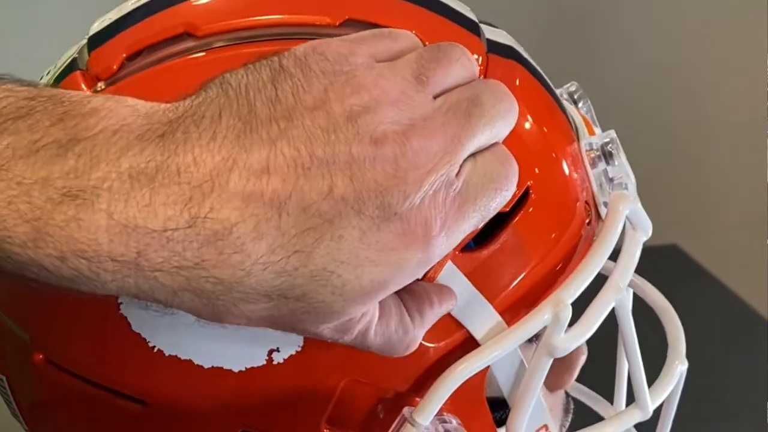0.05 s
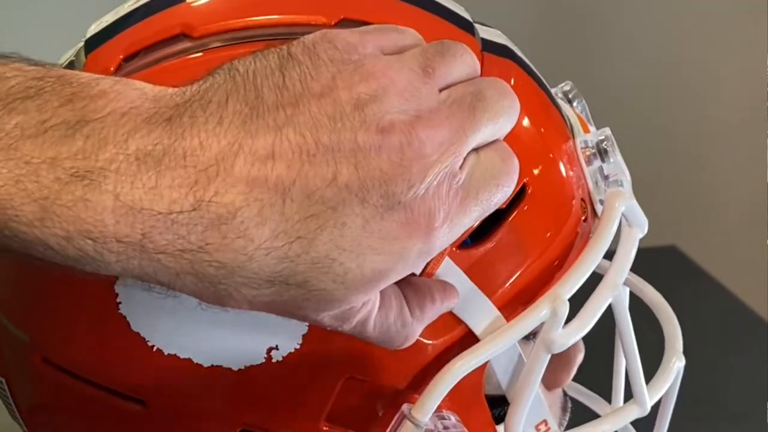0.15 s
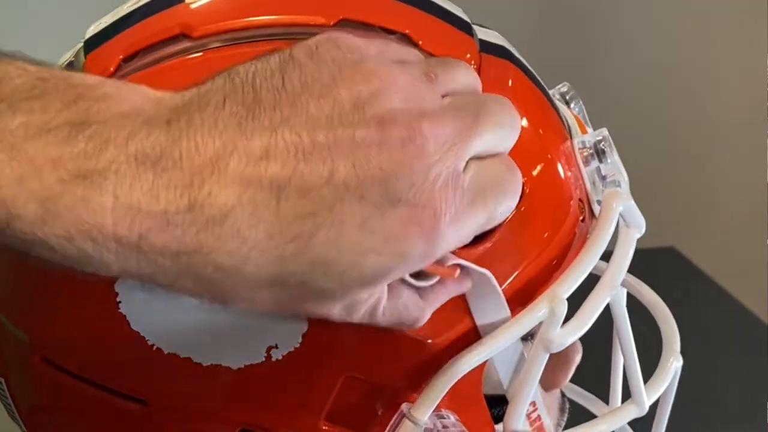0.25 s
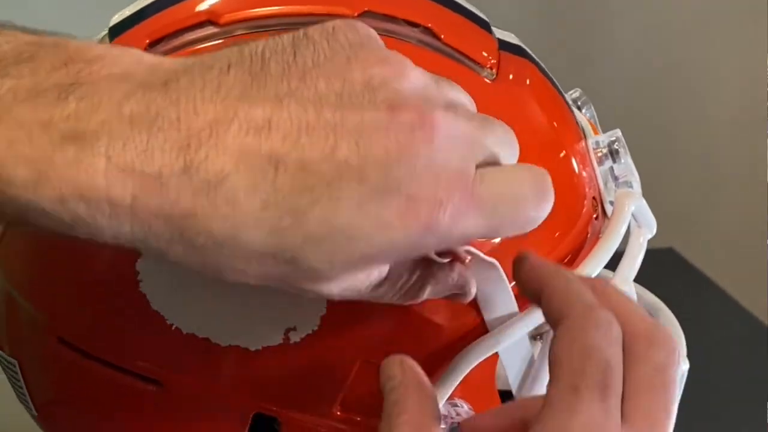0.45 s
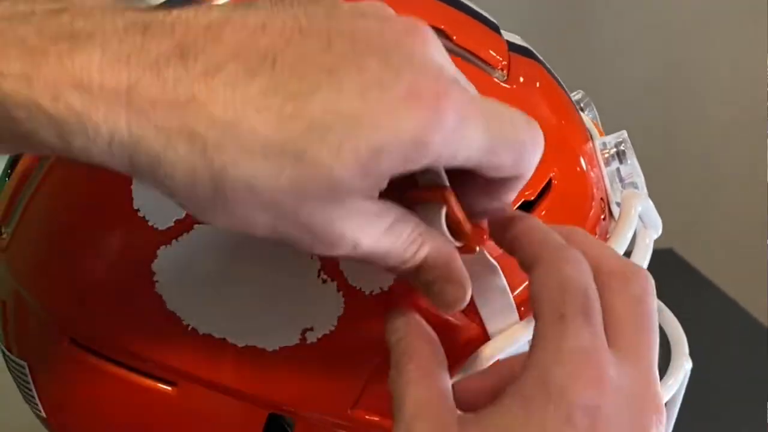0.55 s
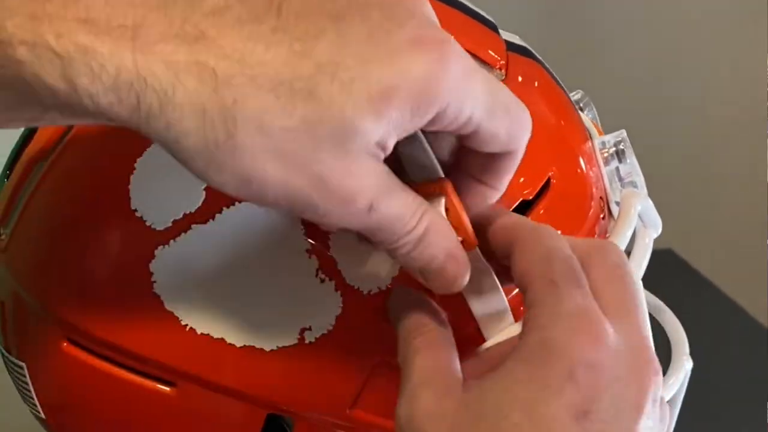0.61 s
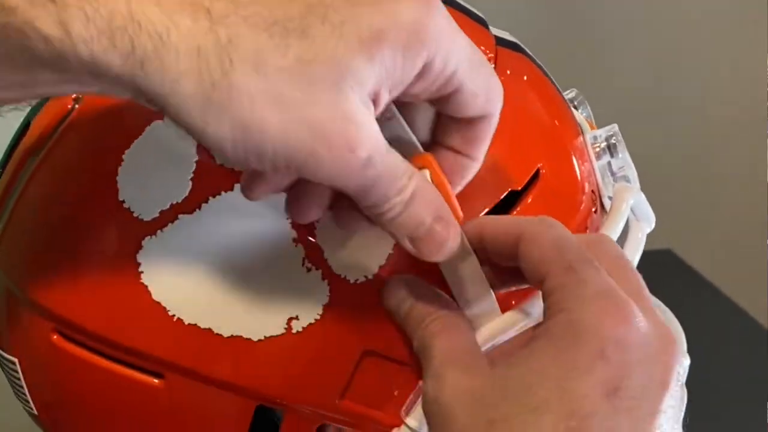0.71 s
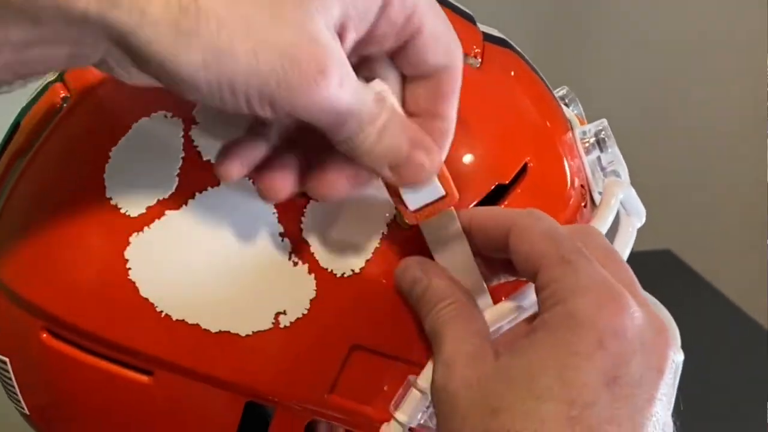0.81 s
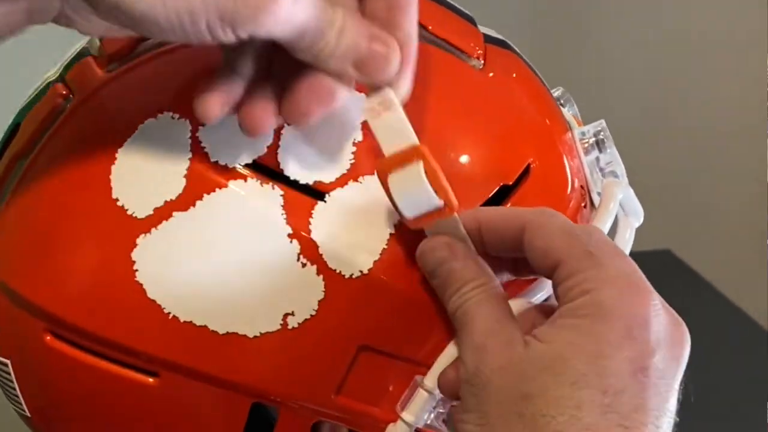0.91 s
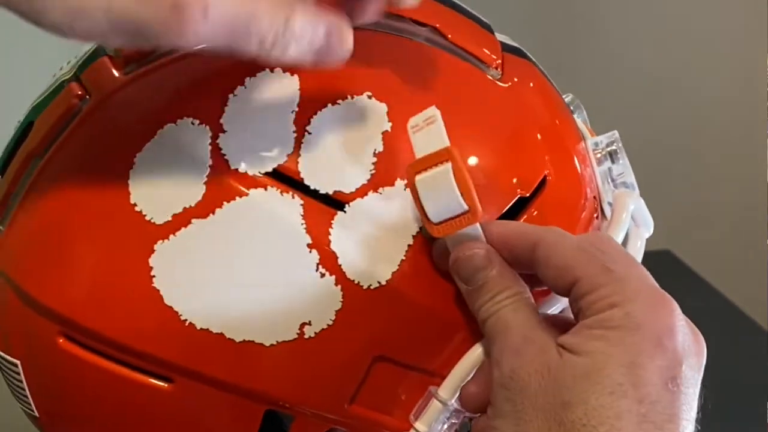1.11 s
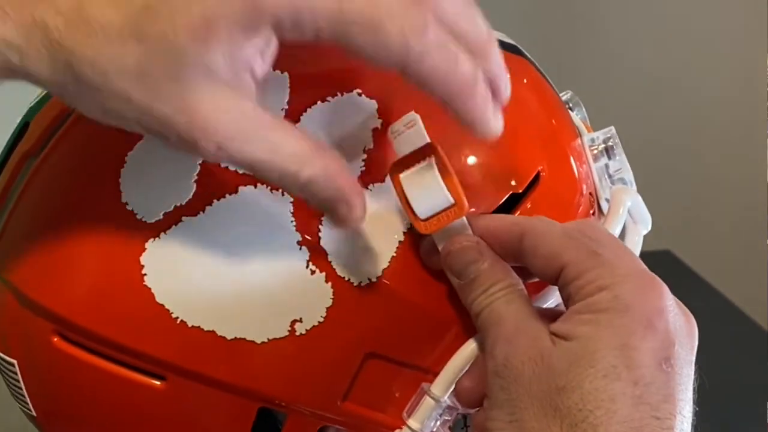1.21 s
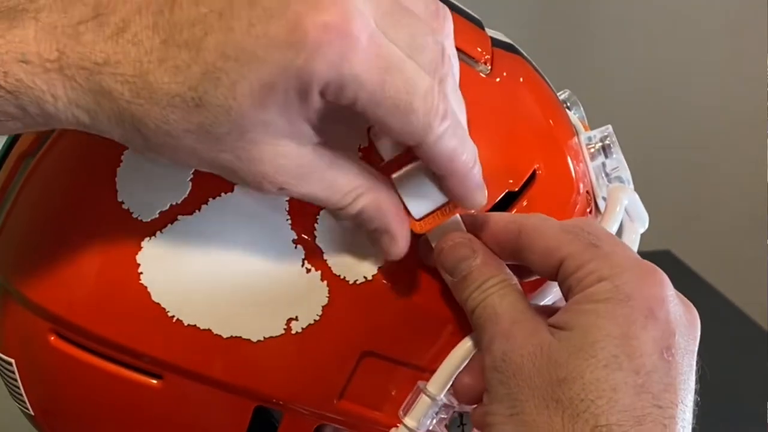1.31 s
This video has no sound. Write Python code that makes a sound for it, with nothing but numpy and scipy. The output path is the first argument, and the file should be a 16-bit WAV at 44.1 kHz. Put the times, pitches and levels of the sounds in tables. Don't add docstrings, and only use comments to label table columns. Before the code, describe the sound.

A plastic helmet strap snap creaks, then pops loudly open, followed by quiet strap rubbing and ticking

```python
import sys
import numpy as np
from scipy import signal
from scipy.fft import rfft, irfft
from scipy.io import wavfile

SR = 44100
rng = np.random.default_rng(int(sys.argv[2]) if len(sys.argv) > 2 else 0)


def ratio_of_db(decibels):
    return 10 ** (np.asarray(decibels, float) / 20)


def unload_wav(signal):
    wavfile.write(
        sys.argv[1],
        SR,
        np.round(np.clip(np.atleast_2d(signal).T, -1, 1) * 32767).astype(np.int16),
    )


N = 59535


def rms_one(x):
    return x / np.sqrt(np.mean(x ** 2) + 1e-20)


def at_hz(points, hz):
    table_hz, value = np.transpose(points)
    return np.interp(np.log(hz + 1), np.log(table_hz + 1), value)


def coloured(x, spectrum):
    hz = np.arange(N // 2 + 1) * SR / N
    low_edge = 1 / (1 + (spectrum[0][0] / (hz + 1)) ** 4)
    high_edge = 1 / (1 + (hz / spectrum[-1][0]) ** 16)
    return irfft(rfft(x) * ratio_of_db(at_hz(spectrum, hz)) * low_edge * high_edge, N)


def band(x, low_hz, high_hz):
    return signal.sosfilt(signal.butter(2, [low_hz, high_hz], "band", fs=SR, output="sos"), x)


def soften(x, hz):
    return signal.sosfilt(signal.butter(2, hz, fs=SR, output="sos"), x)


def ring(push, hz, t60):
    r, w = ratio_of_db(-60 / (t60 * SR)), 2 * np.pi * hz / SR
    return signal.lfilter([0, np.sin(w)], [1, -2 * r * np.cos(w), r * r], push + 1e-18)


def clicks_at(s, gains):
    out = np.zeros(N)
    np.add.at(out, np.minimum((np.asarray(s) * SR).astype(int), N - 1), gains)
    return out


def dying(clicks, decay_s):
    return signal.lfilter([1], [1, -np.exp(-1 / (decay_s * SR))], clicks)


# (frequency [Hz], level [dB])
RUMBLE = [(12, -56), (20, -18.5), (41, -9), (65, 0), (113, -13.5), (152, -15), (173, -24), (219, -23),
          (330, -33.5), (430, -54.5), (730, -120)]
# (frequency [Hz], level [dB])
HUSH = [(180, -29), (300, -1), (800, -16.5), (2000, -19.5), (3130, -25.5), (5460, -27), (7320, -34),
        (12000, -31), (16000, -43)]


def background():
    rumble_db, rumble_side_db, hush_db, hush_alike = -48.5, -35, -71.5, 1.0
    rumble = rms_one(coloured(rng.standard_normal(N), RUMBLE))
    side = rms_one(coloured(rng.standard_normal(N), RUMBLE[3:]))
    rumble = rumble + ratio_of_db(rumble_side_db) * side * np.array([[1], [-1]])
    own, common = rng.standard_normal((2, N)), rng.standard_normal(N)
    hush = rms_one(coloured(own + hush_alike * common, HUSH))
    return ratio_of_db(rumble_db) * rumble, ratio_of_db(hush_db) * hush


# (time [s], peak level [dB], brightness [dB])
SLIPS = [(0.004, -39, -40.5), (0.01, -46.5, -41), (0.016, -41.5, -38), (0.024, -32, -33.5),
         (0.031, -33.5, -35), (0.0373, -36.5, -42), (0.046, -41, -43), (0.055, -41, -40.5),
         (0.066, -41, -41), (0.083, -32, -29), (0.097, -34, -28), (0.11, -35.5, -26.5), (0.1238, -34, -26),
         (0.138, -34.5, -17.5), (0.146, -35.5, -18), (0.154, -37, -33.5), (0.158, -39.5, -34),
         (0.164, -44.5, -37), (0.174, -46, -33.5)]
# (frequency [Hz], level [dB], t60 [s])
HELD_SHELL = [(400, -12, 0.12), (614, -2, 0.017), (944, -11, .025), (1100, 0, 0.018), (1700, 0.5, 0.016),
              (2000, -3, 0.012), (2430, -7, 0.0062), (3150, -14, 0.006)]


def creak():
    slip_lag_cycles, slip_grit_s = 1.3, .0012
    friction_db, friction_end_s = -68, .17
    s, db, bright_db = np.transpose(SLIPS)
    grit = dying(clicks_at(s, ratio_of_db(db + bright_db + 14.5)), slip_grit_s) * rng.standard_normal(N)
    out = band(grit, 4400, 6000) + .3 * band(grit, 8000, 12000)
    straining = 1 / (1 + (np.arange(N) / SR / friction_end_s) ** 12)
    for hz, level_db, t60 in HELD_SHELL:
        late_s = slip_lag_cycles * (1 / hz - 1 / 2000)
        uneven_db = 2.0 * rng.standard_normal(len(s))
        slips = clicks_at(s + late_s, ratio_of_db(db + level_db - 4 + uneven_db))
        out = out + ring(soften(slips, 1.5 * hz), hz, t60)
        friction = rms_one(ring(rng.standard_normal(N), hz, t60))
        out = out + ratio_of_db(friction_db + level_db) * friction * straining
    return out


def squeal(noise):
    start_s, end_s, level_db, rise_db = .206, .2172, -25, 36
    t = np.arange(N) / SR
    swell_db = level_db + rise_db * (t - end_s) / (end_s - start_s)
    slide = (t > start_s) * (t < end_s) * ratio_of_db(np.minimum(swell_db, 0))
    high = rms_one(ring(ring(noise, 4500, .008), 4500, .008))
    low = rms_one(ring(ring(noise, 2200, .004), 2200, .004))
    return slide * (high + .4 * low)


# (time [s], level [dB])
POP = [
    (0.2171, -14.5),
    (0.2181, -8),
    (.2183, -5.5),
    (.2185, -11),
    (0.2229, -21),
    (0.229, -22.5),
    (0.249, -31.5),
]
# (time [s], level [dB])
REBOUND = [
    (0.2178, -3.5),
    (0.219, -23),
    (.2300, -25),
]
# (frequency [Hz], level [dB], t60 [s], left-right [dB])
SHELL = [(386.7, -14.5, 0.076, -0.5), (606, -19.5, 0.031, 7.5), (925, -8, 0.014, -1.5),
         (1205, -11.5, 0.027, -8.5), (1398, -10.5, 0.022, -1), (1640, -3, 0.02, -8.5),
         (1973, -5.5, 0.011, -3), (2430, -15.5, 0.023, 3), (2950, -15.5, 0.01994, 0.5),
         (3803, -21, 0.024, 0), (4340, -16.5, 0.015, 0.5), (4883, -2, 0.0041, -4.5), (6240, -12, 0.0066, 2),
         (8900, -3, .006, 1.5)]


def pop():
    (s, db), (blow_s, blow_db) = np.transpose(POP), np.transpose(REBOUND)
    noise = rng.standard_normal(N)
    crack = dying(clicks_at(s, ratio_of_db(db - 4)), 0.00082) * noise
    fizz = signal.sosfilt(signal.butter(2, 13500, "high", fs=SR, output="sos"), crack)
    out = np.zeros((2, N)) + squeal(noise) + band(crack, 5000, 11000) + 0.4 * fizz
    for k, (hz, level_db, t60, pan_db) in enumerate(SHELL):
        if hz > 3400:
            struck = clicks_at(s, ratio_of_db(db + 2.0 * rng.standard_normal(len(s))))
        else:
            struck = clicks_at(blow_s, ratio_of_db(blow_db))
        sides = ratio_of_db(level_db + pan_db * np.array([[.5], [-.5]]))
        out += (-1) ** k * ring(struck, hz, t60) * sides
    return out


# (frequency [Hz], level per Hz [dB])
WASH = [(300, 0), (400, -4), (1640, 0), (3200, -14.5), (4900, -11), (8800, -13), (11500, -16), (16800, -10)]


def wash():
    click = coloured(clicks_at([POP[0][0] + 0.00079], 1), WASH)
    return ratio_of_db(5) * click / np.sqrt(np.sum(click ** 2))


# (time [s], peak level [dB], centre frequency [Hz], length [s])
BUMPS = [(0.395, -51, 1320, 0.0076), (0.445, -56, 1200, 0.002), (0.515, -57, 1410, 0.011),
         (0.556, -46.5, 1010, 0.0055), (0.585, -41, 1510, 0.0015), (.598, -50, 1030, 0.0026),
         (0.687, -57.5, 1539, 0.0023), (0.7125, -46, 590, 0.0017), (0.714, -43, 400, 0.0066),
         (1.12, -53.5, 400, 0.013), (1.157, -51.5, 400, 0.013), (0.353, -48, 325, 0.0051),
         (0.321, -44, 281, 0.0038), (0.582, -39, 462, 0.007), (0.835, -85, 586, 0.0036),
         (1.345, -54.5, 1010, 0.008)]
# (time [s], level [dB])
SKIPS = [(1.105, -53), (1.113, -55.5), (1.121, -50.5), (1.127, -55), (1.136, -50.5), (1.143, -56),
         (1.145, -56), (1.151, -55.5), (1.159, -52.5), (1.165, -61), (1.17, -59), (1.174, -55),
         (1.183, -61), (1.192, -66)]
# (frequency [Hz], level [dB], t60 [s])
SKIP_MODES = [(750, -4, .012), (1200, -3, .008), (2100, -1, .005), (2600, -6, .004)]


def bumps():
    skip_db = -6
    pushes, t = np.zeros(N), np.arange(N) / SR
    grit = rng.standard_normal(N)
    skips = [(s, db + up_db, hz, .0009) for s, db in SKIPS for hz, up_db in [(800, 1.5), (1500, -2.5)]]
    for s, db, hz, length in BUMPS + skips:
        age = np.clip(t - s, 0, 1) / length
        pushes += ratio_of_db(db) * band(age * np.exp(-age) * grit, hz * .45, hz * 1.6)
    out = 1.58 * pushes
    for hz, level_db, t60 in HELD_SHELL:
        out += 0.12 * ratio_of_db(level_db) * ring(pushes, hz, t60 * 0.11)
    s, db = np.transpose(SKIPS)
    for hz, level_db, t60 in SKIP_MODES:
        taps = clicks_at(s, ratio_of_db(db + skip_db + level_db))
        out += ring(soften(taps, 1.5 * hz), hz, t60)
    return out


# (time [s], peak level [dB], length [s], buckle ring [dB])
TICKS = [(0.402, -56, .002, -15), (0.412, -43.5, 0.0035, -30), (0.4196, -43.5, 0.0013, -25),
         (0.4325, -42, .0015, -27), (0.4353, -50, 0.0012, -15), (0.4486, -42, 0.0026, -25),
         (.4545, -48, .001, -29), (.459, -48, 0.0011, -27), (.473, -46, 0.0037, 7),
         (0.4676, -36, 0.0024, -15), (0.5177, -50, 0.0025, -24), (0.586, -45.5, 0.002, -26),
         (0.6865, -58, 0.0025, -27), (0.7167, -51.5, 0.0023, -47), (0.731, -53, .0015, -40),
         (.7923, -50, 0.0017, -32), (0.82, -35.5, 0.002, -39), (0.836, -47, 0.0021, -30),
         (0.867, -51, 0.00096, -30), (0.849, -37, 0.0021, -37), (0.8586, -33.5, 0.0017, -37),
         (0.8772, -35, 0.0023, -38), (0.8885, -34.5, 0.0044, -12), (0.902, -39, 0.0014, -12),
         (0.9089, -33, 0.0017, -44), (0.913, -33.5, 0.0045, -25), (0.924, -46, 0.0039, -25),
         (0.946, -50, 0.0027, -26), (0.953, -34.5, 0.0024, -13.5), (0.9605, -37.5, 0.0021, -23),
         (1.0022, -35, 0.0017, -54), (1.026, -46, 0.0015, -26), (1.031, -37, 0.0026, -19),
         (1.04, -54, 0.0027, -18), (1.078, -42, 0.0019, -6), (1.0805, -40.5, 0.0016, -16),
         (1.099, -54, .0015, -18), (1.112, -37.5, 0.0014, -23), (1.1138, -39, 0.0028, -19),
         (1.2596, -43, 0.0039, -12), (1.272, -41, 0.003, -48), (1.301, -45, 0.0012, -4),
         (1.322, -47, .002, -3), (1.3266, -41.5, 0.0033, 6.5), (1.3434, -44.5, 0.003, -14.5)]
# (time [s], level [dB])
RUB = [(0.36, -79), (.4, -65), (.44, -69), (.475, -64), (0.53, -70), (0.572, -100), (.7, -74), (0.768, -58),
       (.8, -50), (.85, -51.5), (0.91, -48), (.935, -80), (0.97, -86), (1.05, -78), (1.13, -72),
       (1.17, -100), (1.25, -100), (1.35, -75.5)]
# (frequency [Hz], level per Hz [dB])
STRAP = [(880, -82), (2000, -15.5), (3300, -26.5), (4300, -12.5), (7050, -6), (8600, -1.5), (11200, -10),
         (13200, -2.5), (16900, 1.5)]


def strap():
    grains_per_s, grain_share = 830, .5
    buckle_hz, buckle_t60_s, buckle_db = 5200, .002, -9
    edge_hz, edge_t60_s, edge_db = 11480, 0.0079, -14.5
    t, burst, buckle = np.arange(N) / SR, np.zeros(N), np.zeros(N)
    for s, db, length, ring_db in TICKS:
        shape = ratio_of_db(db - 7.5) * (t >= s) * np.exp(-np.clip(t - s, 0, 1) / length)
        burst += shape
        buckle += shape * ratio_of_db(ring_db + buckle_db)
    s, db = np.transpose(RUB)
    grains = (rng.random(N) < grains_per_s / SR) * ratio_of_db(1.3 * rng.exponential(1, N)) * rng.choice([-1, 1], N)
    texture = grain_share * rms_one(grains) + (1 - grain_share) * rng.standard_normal(N)
    rub = ratio_of_db(np.interp(t, s, db, left=-120) - 6.0) * texture
    white = rng.standard_normal(N)
    fabric = coloured(burst * white + rub, STRAP) / np.std(coloured(white, STRAP))
    rung = ring(buckle * white, buckle_hz, buckle_t60_s) / np.std(ring(white, buckle_hz, buckle_t60_s))
    ping = ring(burst * white, edge_hz, edge_t60_s) / np.std(ring(white, edge_hz, edge_t60_s))
    return fabric + rung + ratio_of_db(edge_db) * ping


def thud():
    knock = soften(clicks_at([1.02], ratio_of_db(-36)), 150)
    return ring(knock, 70, .1)


# (frequency [Hz], t60 [s])
ROOM_T60 = [(250, 0.38), (400, 0.69), (700, .2), (1000, 0.16), (1700, 0.42), (3000, 0.44), (5000, 0.545),
            (12000, 0.46)]
# (frequency [Hz], share [0-1])
ROOM_LIKENESS = [(250, .97), (700, .5), (3000, .3), (5600, .96), (12000, .99)]


def room(x):
    room_db, build_up_s = -9.5, .007
    t, tail = np.arange(SR // 2) / SR, 0
    for low in 125 * 2.0 ** np.arange(7):
        mid, side = band(rng.standard_normal((2, len(t))), low, 2 * low)
        centre = np.sqrt(2) * low
        alike = at_hz(ROOM_LIKENESS, centre)
        pair = np.sqrt(1 + alike) * mid + np.sqrt(1 - alike) * side * [[1], [-1]]
        tail = tail + pair * ratio_of_db(-60 * t / at_hz(ROOM_T60, centre))
    tail *= np.clip(t / build_up_s, 0, 1) ** 2
    tail /= np.sqrt(np.sum(tail ** 2) / 2)
    return ratio_of_db(room_db) * signal.fftconvolve(x[None], tail, axes=1)[:, :N]


# (frequency [Hz], left leads by [radians])
PORTS = [(0, 0), (2000, .1), (2700, 1.2), (5000, .5), (7000, 3.0), (7700, 3.3), (10300, 6.28), (12600, 8.7),
         (14400, 10.2), (16000, 12.3), (16800, 12.6)]


def ports(x):
    low_cut_hz, low_lag_cycles = 240, 1.5
    hz = np.arange(N // 2 + 1) * SR / N
    lag = np.exp(-2j * np.pi * low_lag_cycles * (np.log(hz + 150) - hz / 5000))
    low_cut = 1 / np.sqrt(1 + (low_cut_hz / (hz + 1)) ** 8)
    lead = np.exp(.5j * np.interp(hz, *np.transpose(PORTS)) * np.array([[1], [-1]]))
    return irfft(rfft(x) * lag * low_cut * lead, N)


def scene():
    hand_send_db, pop_send_db = -8, -15
    rumble, hush = background()
    hand, snap = creak() + bumps() + strap(), pop()
    sent = ratio_of_db(hand_send_db) * hand + wash() + ratio_of_db(pop_send_db) * snap.mean(axis=0)
    return ports(snap + hand + room(sent) + hush) + rumble + thud()


def band_limit(x):
    return signal.sosfilt(signal.butter(12, 17020, fs=SR, output="sos"), x)


def record(dry):
    rounded = dry / (1 + (dry / .92) ** 6) ** (1 / 6)
    mix = signal.sosfilt(signal.cheby2(12, 70, 17000, fs=SR, output="sos"), rounded)
    return band_limit(mix)


dry = scene()
out = record(dry)
unload_wav(out)
```